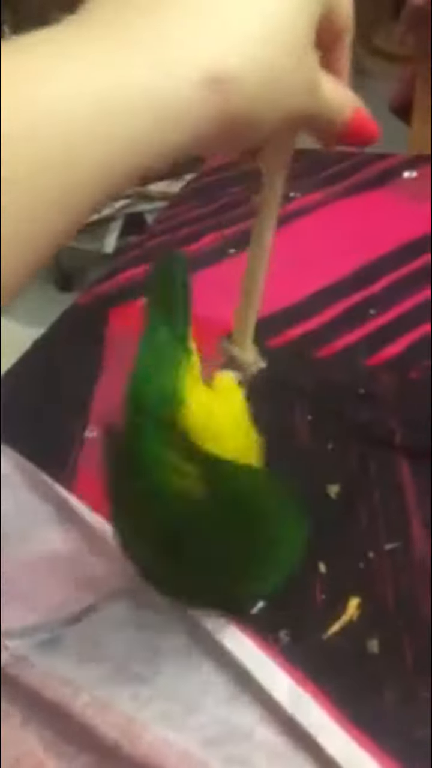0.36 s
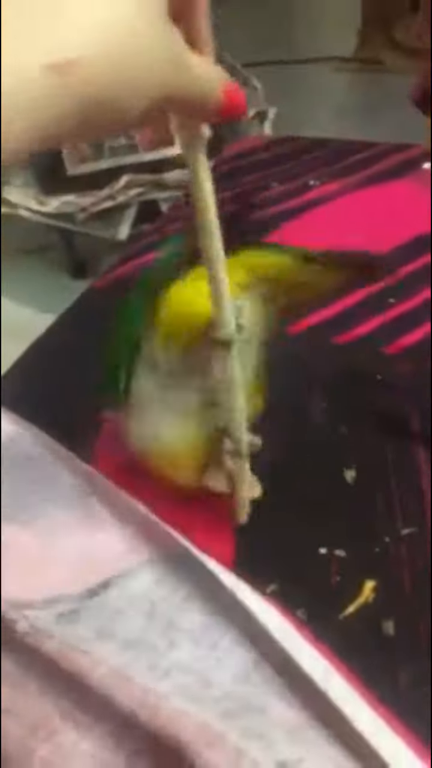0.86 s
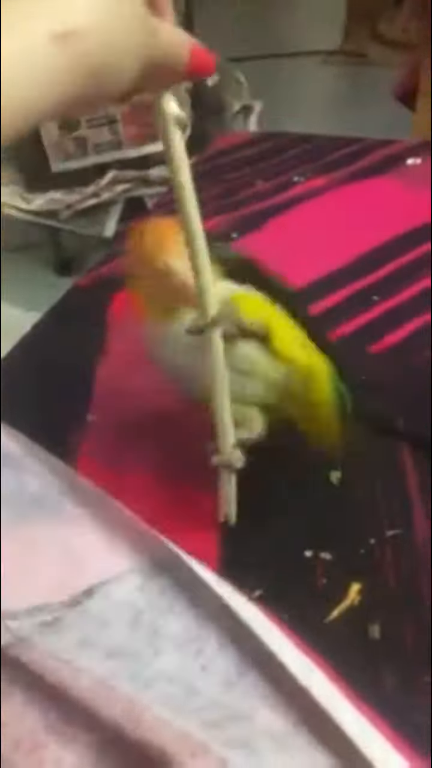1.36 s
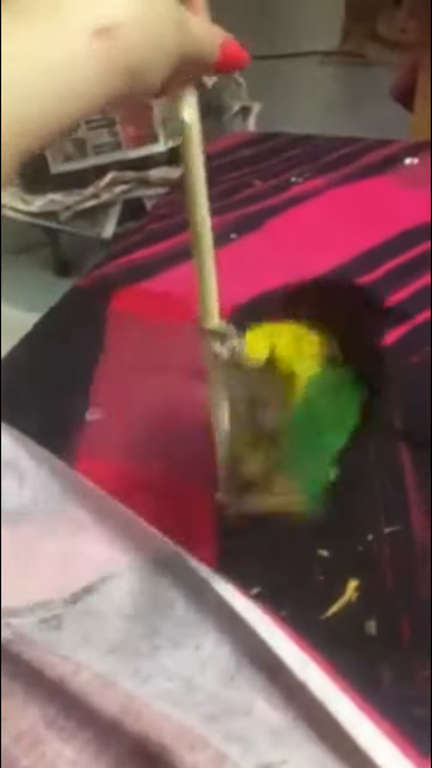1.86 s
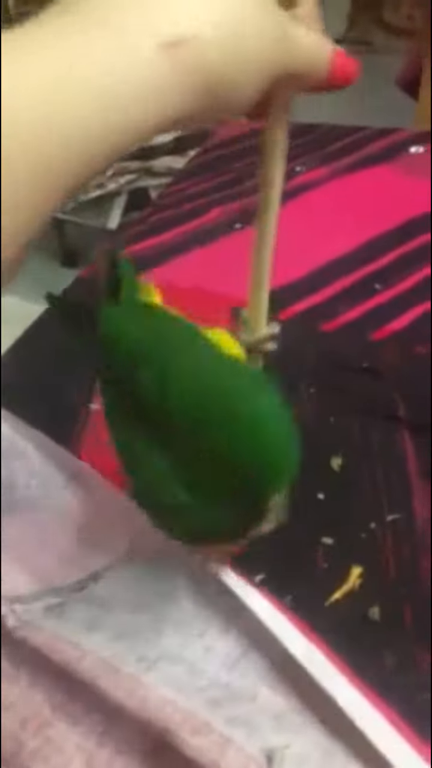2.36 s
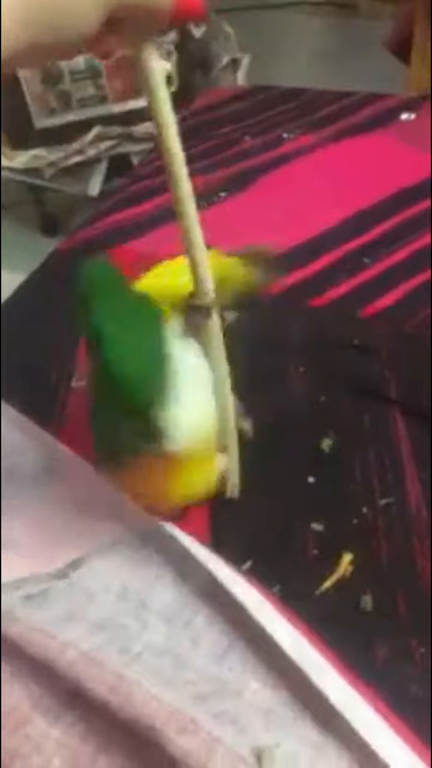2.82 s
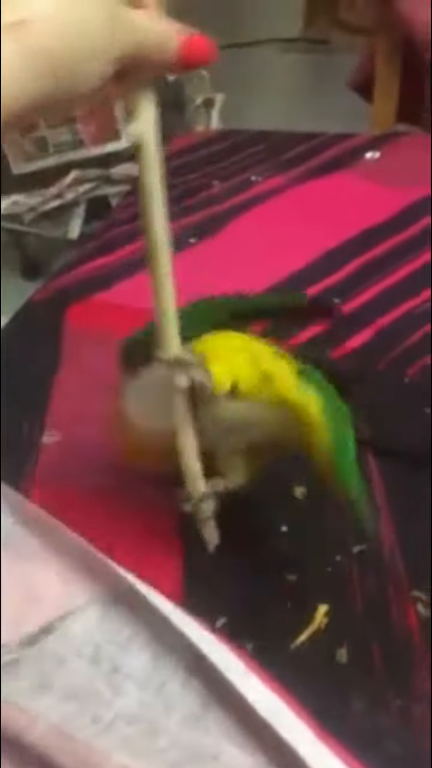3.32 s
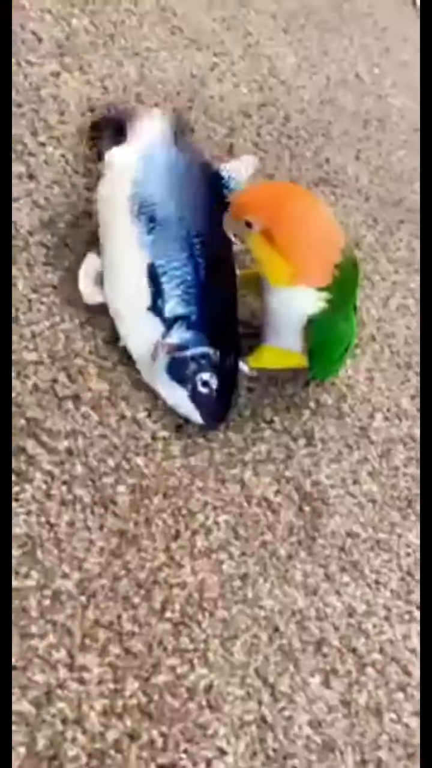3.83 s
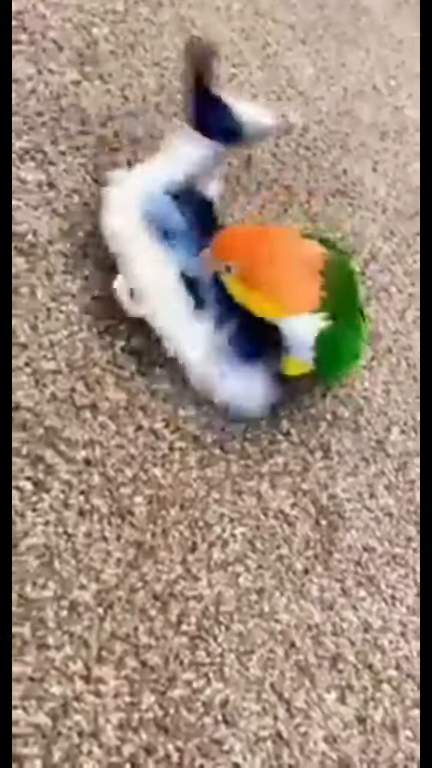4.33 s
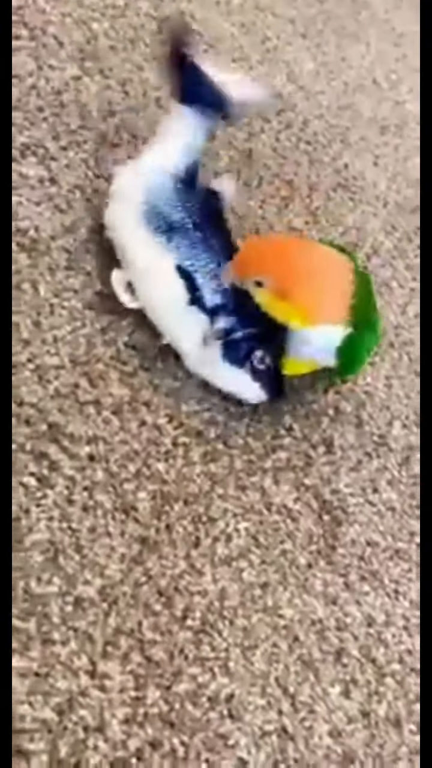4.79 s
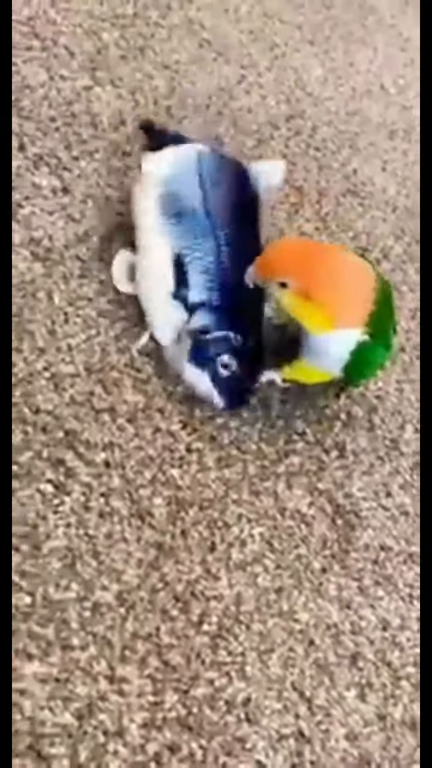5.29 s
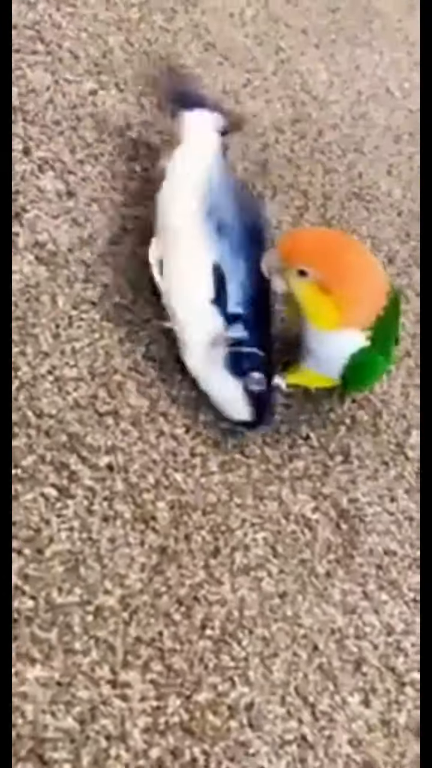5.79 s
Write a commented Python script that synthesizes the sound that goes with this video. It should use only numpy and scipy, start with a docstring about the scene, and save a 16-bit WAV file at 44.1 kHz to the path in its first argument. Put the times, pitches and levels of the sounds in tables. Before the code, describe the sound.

Feathers swish over bedding with wooden ticks and soft mattress bumps above a fan, then a humming motor toy flaps on carpet and a parrot squawks.

```python
"""Indoors, two places with a short silence between. Over a bed a small parrot swings on a stick: feathers sweep
the cloth as filtered noise over a soft hiss, beak and claws tick on resonant wood, its body bumps the mattress,
a fan drones. On a carpet a motor toy flaps five times a second over a mains hum, with noisy gears and a thumping
tail, until the parrot squawks at it, a gliding tone chopped by a slower one. One microphone, both channels alike."""
import sys
import numpy as np
from scipy import signal
from scipy.fft import rfft, irfft, next_fast_len
from scipy.io import wavfile
from scipy.ndimage import uniform_filter1d, map_coordinates

SR = 44100
rng = np.random.default_rng(int(sys.argv[2]) if len(sys.argv) > 2 else 0)


def output_pcm(signal):
    """Save a mono or channel-first signal as 16-bit PCM at the path in sys.argv[1].

    Samples are clipped to [-1, 1] before scaling.
    """
    pcm = np.clip(np.atleast_2d(signal).T, -1, 1) * 32767
    wavfile.write(sys.argv[1], SR, np.round(pcm).astype(np.int16))


def decibels_to_gain(level_db):
    """Convert a level in decibels to a linear amplitude gain (20 dB per decade)."""
    exponent = np.asarray(level_db, float) / 20
    return 10 ** exponent


N = 271656  # length [samples]


def unit(x):
    """Scaled to rms 1."""
    return x / np.sqrt(np.mean(x ** 2) + 1e-20)


def curves(rows):
    """One value per sample for each column after the time."""
    s, *cols = np.transpose(rows)
    return [np.interp(np.arange(N) / SR, s, c) for c in cols]


def wobble(rate):
    """A smooth random curve, rate knots a second."""
    knots = rng.standard_normal(int(N * rate / SR) + 4)
    return map_coordinates(knots, [np.arange(N) * rate / SR])


def filtered(x, response):
    """x times a complex response of frequency."""
    m = next_fast_len(N + 8192)
    return irfft(rfft(x, m) * response(np.fft.rfftfreq(m, 1 / SR)), m)[..., :N]


def colour(points):
    """Gain through (frequency [Hz], gain [dB]) points on a log axis, closed outside."""
    f, db = np.transpose(points)
    return lambda hz: decibels_to_gain(np.interp(np.log(hz + 1), np.log(f + 1), db, left=-120, right=-120))


def modes(rows):
    """Causal response of (frequency [Hz], width [Hz], gain [dB]) resonances, alternating in sign."""
    def response(f):
        total = 0
        for k, (centre, width, db) in enumerate(rows):
            damping = 1j * f * width
            total = total + (-1) ** k * decibels_to_gain(db) * damping / (centre * centre - f * f + damping)
        return total
    return response


def patchy(depth_db, across, along):
    """White noise with random patches of gain, across bins wide and along frames long."""
    z = signal.stft(rng.standard_normal(N), nperseg=512)[2]
    field = uniform_filter1d(uniform_filter1d(rng.standard_normal(z.shape), across, 0), along, 1)
    return signal.istft(z * decibels_to_gain(depth_db * unit(field)), nperseg=512)[1][:N]


def bursts(times, dbs, t60s):
    """Dying noise at each time, its energy set by level and length."""
    out, t = np.zeros(N + SR), np.arange(SR // 4) / SR
    for s, db, t60 in zip(times, dbs, t60s):
        fade = decibels_to_gain(-60 * t / t60) * (1 - np.exp(-t / t60 / .03))
        grain = fade * rng.standard_normal(len(t))
        grain *= np.linalg.norm(fade) / np.linalg.norm(grain)
        out[round(s * SR):][:len(t)] += decibels_to_gain(db) * grain
    return out[:N]


def room(x, t60):
    """Diffuse answer of energy 1; the treble dies sooner."""
    hz, t, z = signal.stft(rng.standard_normal(SR // 2), SR, nperseg=256)
    fade = decibels_to_gain(-60 * t * (1 + hz[:, None] / 9000) / t60)
    tail = signal.istft(z * fade, SR, nperseg=256)[1]
    return signal.fftconvolve(np.pad(x, (200, 0)), tail / np.linalg.norm(tail))[:N]


# Steady fan tones: (frequency [Hz], mean level [dB])
FAN_TONES = [(48.1, -59.5), (96, -69), (134, -64.5), (193, -74), (240.4, -68.5), (298, -73), (384.4, -71),
             (480.6, -78), (528.7, -84), (597, -82)]
# Colour of the low air: (frequency [Hz], gain [dB])
LOW_AIR_COLOUR = [(21, -29), (35, -1), (59, -3.5), (176, -7), (241, -9), (338, -6.5), (377, -9.5),
                  (432, -12), (900, -31.5), (1170, -53.5), (1980, -120)]
# Level of the low air and the bumps' rumble, before a constant gain: (time [s], level [dB])
LOW_AIR_LEVEL = [(0.0, -63), (0.21, -62.5), (1.09, -61.5), (1.47, -57.5), (3.21, -61.5), (3.41, -54),
                 (3.55, -59.5)]


def fan():
    """Slightly unsteady shaft and panel tones over low air noise, which also carries rumble of the bumps."""
    t = np.arange(N) / SR
    tones = np.zeros(N)
    for hz, db in FAN_TONES:
        level = np.sqrt(2) * decibels_to_gain(db + 1.9 * wobble(8.2))
        tones += level * np.sin(2 * np.pi * hz * t + .5 * wobble(5.37))
    air = unit(filtered(patchy(1.2, across=3, along=8), colour(LOW_AIR_COLOUR)))
    gain_db = 0.5
    return tones + decibels_to_gain(curves(LOW_AIR_LEVEL)[0] + gain_db) * air


# Slowly varying background hiss with soft brushing, before the band shares:
# (time [s], level [dB], airy over dull [dB])
BACKGROUND_HISS = [(0.0, -68, -2.5), (0.33, -68, -6), (0.52, -65.5, -1), (1.02, -67.5, -1),
                   (1.56, -64, -2.5), (2.38, -66.5, -2), (2.81, -67, -4), (3.02, -69, 1), (3.27, -67, -3),
                   (3.4, -61.5, 7), (3.55, -62, 0)]
# Quick feather sweeps: (time [s], length [s], dull level [dB], bright level [dB], airy level [dB])
FEATHER_SWEEPS = [(0.284, 0.23, -71, -66.5, -76), (1.57, 0.21, -70.5, -71, -75),
                  (0.61, 0.085, -77, -71, -66), (0.832, 0.036, -65.5, -65, -62),
                  (0.87, 0.018, -63.5, -63, -67), (0.889, 0.06, -63.5, -61, -62.5),
                  (1.256, 0.1, -66.5, -76, -66), (1.438, 0.073, -74, -68, -63),
                  (1.865, 0.063, -73, -67, -66), (2.066, 0.027, -66, -64.5, -65),
                  (2.255, 0.11, -66, -62.5, -56), (2.587, 0.18, -87, -73, -65.5),
                  (2.756, 0.061, -67, -62, -58), (3.201, 0.033, -69, -64, -67),
                  (3.398, 0.055, -70, -80, -77), (3.561, 0.15, -69, -61.5, -64)]
# Colours of the three bands: (frequency [Hz], gain [dB])
DULL_COLOUR = [(450, -21), (700, -0.5), (2800, -2.5), (3800, -1.5), (5000, -14.5)]
BRIGHT_COLOUR = [(3800, -19), (5000, -10.5), (6500, -8), (7700, -11), (9000, -36)]
AIRY_COLOUR = [(7000, -24.5), (8500, -2.5), (12500, -7), (14000, -9), (15700, -25.5), (15800, -67.5)]


def cloth():
    """Feathers sweep the cover, dull to airy, in crackling noise over a background hiss with soft brushing."""
    t = np.arange(N) / SR
    level_db, tilt_db = curves(BACKGROUND_HISS)
    dull_db, bright_db, airy_db = -4.5, -6.5, -4.5  # shares of the background level
    power = decibels_to_gain([level_db + dull_db - tilt_db / 2,
                 level_db + bright_db,
                 level_db + airy_db + tilt_db / 2]) ** 2
    for s, length, *db in FEATHER_SWEEPS:
        sweep = np.clip(np.minimum(t - s, s + length - t) / (0.29 * length), 0, 1)
        power += decibels_to_gain(np.c_[db]) ** 2 * sweep
    out = np.zeros(N)
    for band_power, band in zip(power, (DULL_COLOUR, BRIGHT_COLOUR, AIRY_COLOUR)):
        crackle = patchy(2.1, across=8, along=10) * decibels_to_gain(1.4 * wobble(400) + 1.0 * wobble(29.91))
        out += np.sqrt(band_power) * unit(filtered(crackle, colour(band)))
    return out


# Beak and claws on wood, strength of each contact in four bands before the stick's resonances:
# (time [s], low level [dB], middle level [dB], high level [dB], top level [dB])
CONTACTS = [(1.251, -34.5, -39.5, -37, -56), (1.477, -65, -58, -45, -56), (1.494, -54, -55, -53, -52),
            (1.5208, -46.5, -47, -50, -44.5), (1.6287, -44, -65, -59, -55),
            (1.6767, -43.5, -46, -46.5, -64), (1.712, -47.5, -71, -67, -63),
            (2.3262, -50, -45.5, -45, -43.5), (2.4255, -67, -66, -50.5, -64), (2.8053, -55, -60, -47, -51),
            (3.2215, -65, -61.5, -51, -56), (3.3491, -59, -56, -49.5, -54.5), (3.377, -60, -56, -63.5, -62),
            (3.402, -60, -57, -45.5, -50.5), (3.411, -60, -51, -61, -65)]
# Low, middle, high and top resonance, each passed twice: (frequency [Hz], width [Hz], gain per pass [dB])
STICK_MODES = [(1600, 2340, 6), (3370, 2100, 7.5), (6600, 4700, 7), (10300, 4000, 7)]


def ticks():
    """Each contact, one sharp snap and a brief scratch, excites the resonances of the stick in its own shares."""
    s, *levels = np.transpose(CONTACTS)
    dry = np.zeros(N)
    for db, mode in zip(levels, STICK_MODES):
        scratch = bursts(s, db, np.full(len(s), .009))
        snap = 3 * np.bincount((s * SR).astype(int), decibels_to_gain(db), N)
        dry += filtered(scratch + snap, lambda hz: modes([mode])(hz) ** 2)
    return dry + decibels_to_gain(-14.0) * room(dry, 0.39)


# Body on the mattress, levels before the filters:
# (time [s], boom level [dB], slap level [dB], t60 [s], hardness [Hz])
BODY_BLOWS = [(1.301, -43, -73, 0.24, 500), (1.494, -41, -57, 0.2, 600), (1.747, -37, -80, 0.061, 345),
              (1.756, -31.5, -82, .07, 278), (1.78, -36, -80, 0.1, 160), (2.329, -41, -60, 0.25, 600),
              (3.238, -34.5, -34.5, 0.044, 700), (3.248, -35, -61, 0.15, 500),
              (3.347, -39.5, -52.5, 0.11, 500)]
# Mattress resonances: (frequency [Hz], width [Hz], gain [dB])
MATTRESS_MODES = [(120, 41, 15), (246, 47, 17.5), (400, 190, 14)]


def bumps():
    """Each blow pushes the mattress once and leaves it rumbling, duller when soft; hard ones slap the cover too."""
    boom = np.zeros(N)
    for s, db, _, t60, hard_hz in BODY_BLOWS:
        kick = 22 * decibels_to_gain(db) * (np.arange(N) == round(s * SR))
        push = bursts([s], [db], [t60]) + kick
        boom += filtered(push, lambda hz: modes(MATTRESS_MODES)(hz) / (1 + 1j * hz / hard_hz) ** 3)
    s, _, slap_db, t60, _ = np.transpose(BODY_BLOWS)
    cover = modes([(1700, 2600, 8)])
    slap = filtered(bursts(s, slap_db, t60), lambda hz: cover(hz) / (1 + (hz / 2500) ** 6))
    answer = filtered(room(slap, 0.34), lambda hz: 1 / (1 + 1j * hz / 1500))
    return boom + slap + decibels_to_gain(0.5) * answer


# Faint far tones, levels relative: (time [s], length [s], frequency [Hz], level [dB])
FAR_TONES = [(2.54, .12, 1280, -64.5), (2.89, .17, 2880, -67), (2.93, .2, 3170, -70.5),
             (3.42, .1, 3120, -70), (3.45, .12, 2850, -72), (3.5, .12, 3200, -71)]


def peeps():
    """Faint breathy tones from farther off: a quick start, a wavering fade."""
    out, t = np.zeros(N), np.arange(N) / SR
    for s, length, hz, db in FAR_TONES:
        u = np.clip((t - s) / length, 0, 1)
        fade = np.minimum(u / 0.076, 1) * (1 - u) ** 0.77
        breathy = np.sin(2 * np.pi * hz * t + 1.4 * wobble(90)) * (1 + .5 * wobble(70))
        out += decibels_to_gain(db) * fade * breathy
    return .6 * out + room(out, .3)  # distant: more room than direct sound


# Colour of the low room rumble: (frequency [Hz], gain [dB])
RUMBLE_COLOUR = [(12, -63), (20, -14), (64, -12), (90, -12.5), (123, -12), (149, -16), (190, -25.5),
                 (1300, -36.5), (1690, -83), (2860, -120)]
# Colour of the faint hiss: (frequency [Hz], gain [dB])
HISS_COLOUR = [(2060, -31), (3500, -15), (5550, -5), (7750, -6), (13200, -20), (14400, -17), (15800, -25)]


def hum():
    """An appliance hums at twice the mains rate over a low room rumble and a faint hiss."""
    hum_db, rumble_db, hiss_db = -41, -53.5, -66  # mean levels
    hiss = decibels_to_gain(hiss_db) * unit(filtered(patchy(1.5, across=8, along=10), colour(HISS_COLOUR)))
    phase = 2 * np.pi * 119.9 * np.arange(N) / SR + .06 * wobble(4.8)
    tone = np.sqrt(2) * decibels_to_gain(hum_db + .5 * wobble(5.2)) * np.sin(phase)
    rumble = unit(filtered(patchy(2.5, across=3, along=8), colour(RUMBLE_COLOUR)))
    return tone + hiss + decibels_to_gain(rumble_db + 2.8 * wobble(6)) * rumble


# Motor strokes, down and up in turn, before the load's fall: (start [s], grind level [dB], rasp level [dB])
MOTOR_STROKES = [(3.918, -39, -46.5), (4.109, -41, -44.5), (4.288, -39, -46), (4.489, -41.5, -44.5),
                 (4.669, -39, -45.5), (4.869, -41, -44), (5.052, -39.5, -45.5), (5.252, -40.5, -41.5),
                 (5.432, -39.5, -46.5), (5.632, -41.5, -44), (5.82, -37, -45.5), (6.01, -38, -42.5),
                 (6.19, -41, -46)]
# Down stroke, load peaks as the tail lands: (share of the stroke [0-1], grind change [dB], rasp change [dB])
DOWN_LOAD = [(0, -17.5, -21.5), (.09, -10, -9), (.24, -7, 0.5), (.42, -0.5, 2.5), (.6, -6, -6),
             (.75, -10, -11.5), (.92, -14.5, -18.5)]
# Up stroke, an even pull: (share of the stroke [0-1], grind change [dB], rasp change [dB])
UP_LOAD = [(0, -18.5, -28.5), (.08, -8.5, -13.5), (.27, -1.5, 1), (.42, -0.5, -0.5), (.58, -1, -3.5),
           (.78, -7, -11.5), (.93, -15.5, -22.5)]
# Plastic casing resonances: (frequency [Hz], width [Hz], gain [dB])
CASING_MODES = [(830, 2140, -15), (1587, 200, -7), (1888, 100, -2.5), (2250, 170, -0.5), (2584, 203, -2),
                (2867, 101, 0.5), (3226, 153, -1)]
# Colour of the gears' rasp: (frequency [Hz], gain [dB])
GEAR_COLOUR = [(3650, -28), (3900, -3.5), (4240, 0), (4500, -6), (4800, -8.5), (5300, -7), (6100, -4),
               (7100, -1.5), (8400, -7), (8800, -18), (10000, -9), (12000, -18.5), (15700, -30.5),
               (15800, -64)]
# Tail on the carpet, level before the carpet's filters: (time [s], level [dB], t60 [s])
TAIL_THUMPS = [(4.004, -31, 0.078), (4.376, -37, 0.051), (4.684, -40.5, 0.027), (4.754, -37, 0.032),
               (5.134, -37, 0.071), (5.897, -35.5, 0.071)]
# Carpet resonances: (frequency [Hz], width [Hz], gain [dB])
CARPET_MODES = [(70, 37, 17.5), (182, 32, 22.5), (297, 83, 16), (460, 145, 10)]
# Gears take up their play, level before the filter: (time [s], level [dB])
GEAR_CLACKS = [(4.119, -52), (4.1456, -34), (4.503, -42), (4.8772, -38.5), (5.0594, -44), (5.2583, -42),
               (5.6466, -35), (5.8414, -34)]


def toy():
    """Gear teeth chatter unevenly in the plastic casing on every stroke; the load throbs once a shaft turn."""
    load = []
    for k, ((s, db, high_db), (end, *_)) in enumerate(zip(MOTOR_STROKES, MOTOR_STROKES[1:])):
        for share, fall_db, high_fall_db in (DOWN_LOAD, UP_LOAD)[k % 2]:
            load.append((s + share * (end - s), db + fall_db, high_db + high_fall_db))
    grind_db, rasp_db = curves(sorted(load))
    shaft = np.cumsum(100 + 15 * wobble(6.8)) / SR  # turns
    throb = 1 + .22 * np.sin(2 * np.pi * shaft)

    def teeth():
        """Uneven chatter noise, throbbing with the shaft."""
        return patchy(2.6, across=5, along=9) * decibels_to_gain(1.5 * wobble(900) + 1.3 * wobble(45)) * throb

    grind_colour = colour([(500, -7.5), (1300, -6.0), (1500, -0.5), (3400, -1), (3600, 2.0), (5000, -30)])
    grind = filtered(filtered(teeth(), modes(CASING_MODES)), grind_colour)
    rasp = filtered(teeth(), colour(GEAR_COLOUR))
    gears = decibels_to_gain(grind_db) * unit(grind) + decibels_to_gain(rasp_db) * unit(rasp)

    s, db, t60 = np.transpose(TAIL_THUMPS)
    kick = 12 * np.bincount((s * SR).astype(int) + 200, decibels_to_gain(db), N)  # 200 samples after the noise starts
    blow = filtered(0.66 * bursts(s, db, t60) + kick, modes(CARPET_MODES))
    thump = filtered(blow, modes([(220, 480, 0.0041)]))

    s, db = np.transpose(GEAR_CLACKS)
    clack = filtered(bursts(s, db, np.full(len(s), .03)), modes([(2720, 1300, 0), (6800, 1400, 0.0046)]))
    return gears + thump + clack


# A rising chirp, then the arched cry, before roughness: (time [s], pitch [Hz], tone level [dB])
CRY = [(5.85, 1450, -61), (5.895, 1718, -52), (5.91, 1910, -36.5), (5.95, 2063, -46), (5.98, 2293, -35.5),
       (6.008, 2380, -23.5), (6.035, 2395, -24.5), (6.055, 2250, -32), (6.08, 2220, -31.5),
       (6.12, 1970, -38.5), (6.16, 1764, -41.5)]
# Octave and breath of the cry: (time [s], octave level [dB], hoarse level [dB])
CRY_VOICE = [(5.85, -77, -66), (5.877, -52, -50), (5.881, -35.5, -46), (5.915, -41.5, -48),
             (5.95, -66, -61), (6.0, -52, -38), (6.043, -55, -40), (6.057, -42, -40), (6.1, -60, -38),
             (6.16, -57, -55)]
# Roughness of the cry: (time [s], roughness [0-1])
CRY_ROUGHNESS = [(5.85, .85), (5.93, .7), (5.97, .3), (6.0, .1), (6.04, .15), (6.056, .5), (6.1, .8),
                 (6.16, .55)]
# Colour of the hoarse air: (frequency [Hz], gain [dB])
THROAT_COLOUR = [(1500, -40), (2400, -13.5), (3200, 7.5), (4500, 7.5), (5000, -34), (5500, -4), (7200, -1),
                 (8500, -0.5), (8800, -25), (10000, -5.5), (12000, -28), (15800, -20)]


def squawk():
    """A whistle-like membrane tone; a slower second vibration chops it, and hoarse air rides on the chop."""
    pitch_hz, tone_db = curves(CRY)
    octave_db, hoarse_db = curves(CRY_VOICE)
    rough, = curves(CRY_ROUGHNESS)
    phase = 2 * np.pi * np.cumsum(pitch_hz * (1 + .065 * rough * wobble(400))) / SR
    flutter = 2 * np.pi * np.cumsum(230 - 170 * rough + 60 * rough * wobble(60)) / SR
    chop = 1 + np.clip(1.1 * rough, 0, .9) * np.sin(flutter) + .1 * wobble(150)

    third = 0.2 * (1 - rough) * np.sin(3 * phase + 1.5 * wobble(600))
    tone = decibels_to_gain(tone_db) * (np.sin(phase) + 0.21 * np.sin(phase + flutter) + third)
    octave = decibels_to_gain(octave_db) * np.sin(2 * phase + 1.2 * rough * wobble(500))

    breath = rng.standard_normal(N) * (1 + 0.33 * np.sin(flutter)) * decibels_to_gain(2.1 * wobble(250))
    air = filtered(breath, colour(THROAT_COLOUR))
    # a hoarse band 900 Hz to either side of 1.6 times the pitch, between tone and octave
    between = filtered(rng.standard_normal(N), lambda hz: hz < 900) * np.sin(1.6 * phase)
    hoarse = unit(air) + decibels_to_gain(-6.5) * chop * unit(between)

    started = np.arange(N) > CRY[0][0] * SR
    dry = (np.sqrt(2) * chop * (tone + octave) + decibels_to_gain(hoarse_db) * hoarse) * started
    return dry + decibels_to_gain(-8.0) * room(dry, 0.37)


def scene():
    """The bed scene, silence, then the carpet scene, with the band above 8750 Hz missing until 4.279 s."""
    bed_end, carpet_start, band_missing_until = 3.741, 3.938, 4.279  # [s]
    t = np.arange(N) / SR
    bed = fan() + cloth() + ticks() + bumps() + peeps()
    bed = bed * np.clip((bed_end - t) / 0.002, 0, 1)
    carpet = hum() + toy() + squawk()
    high_band = filtered(carpet, lambda hz: hz > 8750)
    carpet = carpet - high_band * (t < band_missing_until)
    carpet = carpet * np.clip((t - carpet_start) / 0.00052, 0, 1)
    return np.array([bed + carpet] * 2)


def low_pass(x):
    """Removes everything above the highest recorded frequency."""
    return signal.sosfilt(signal.butter(12, 16370, fs=SR, output="sos"), x)


def record(dry):
    """The finished mix of the one microphone, on both channels."""
    return low_pass(dry)


dry = scene()
out = record(dry)
output_pcm(out)
```